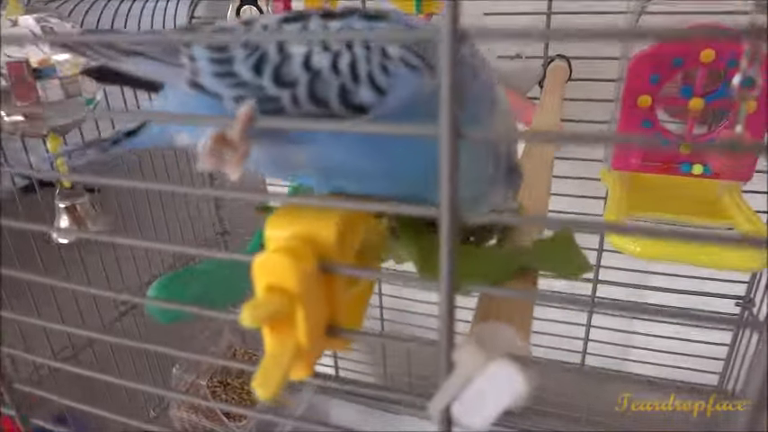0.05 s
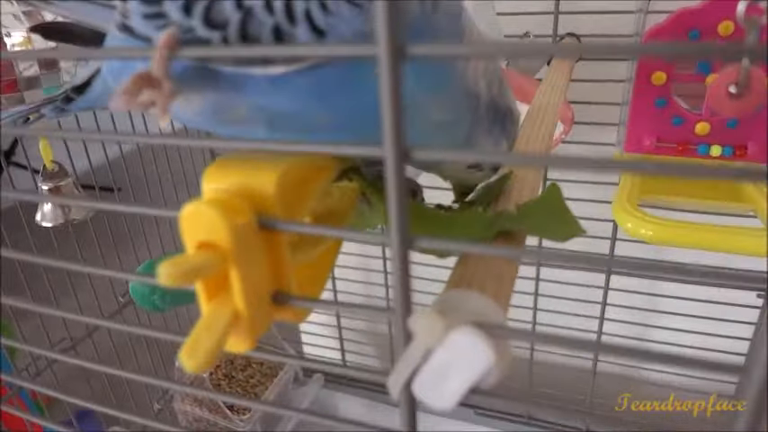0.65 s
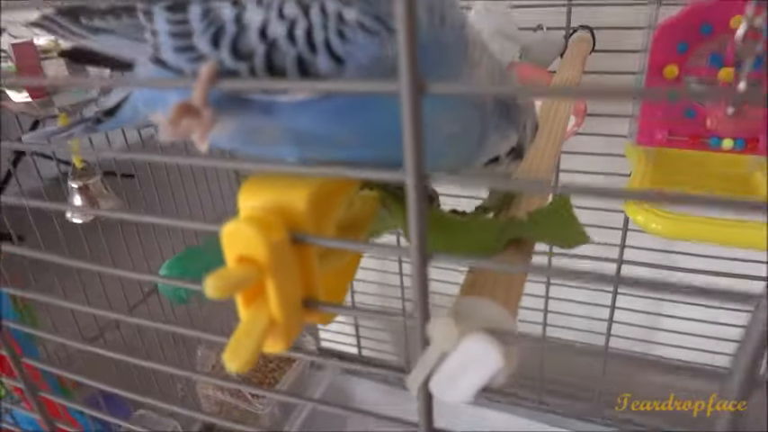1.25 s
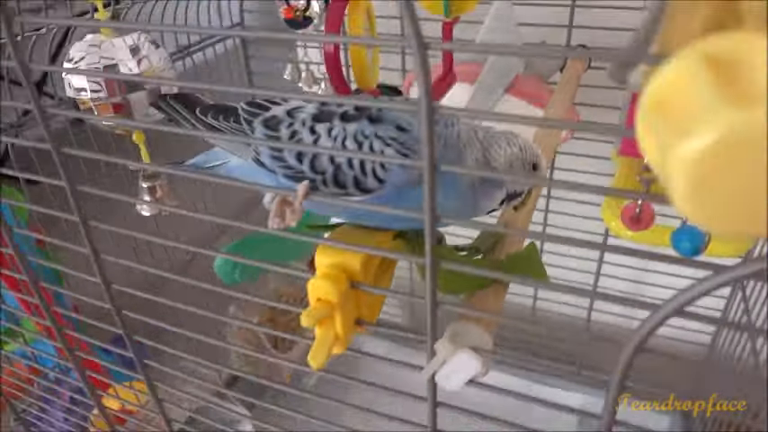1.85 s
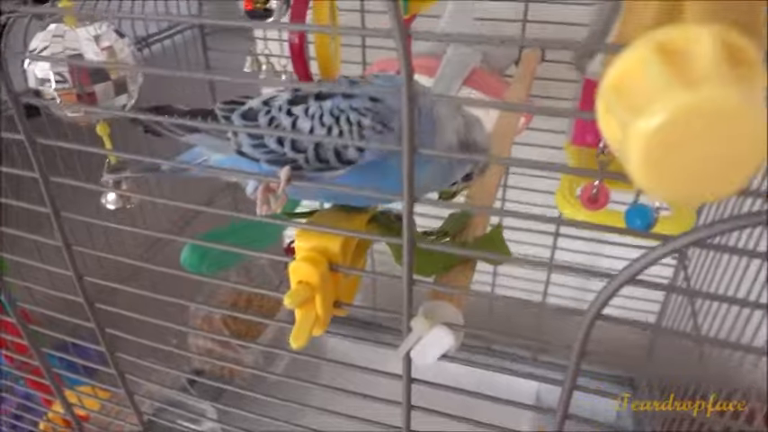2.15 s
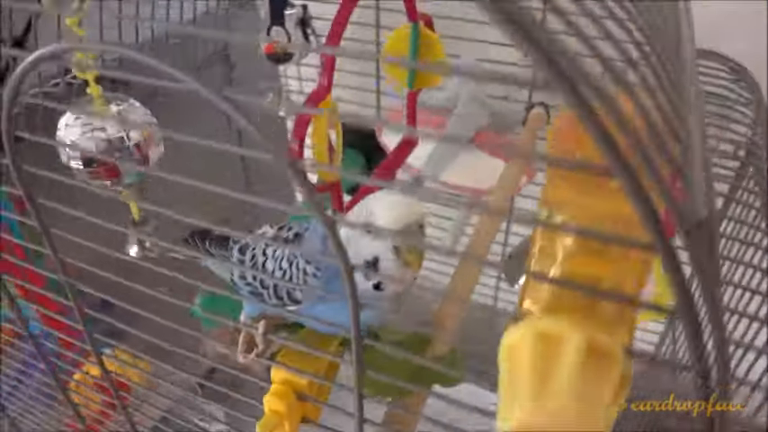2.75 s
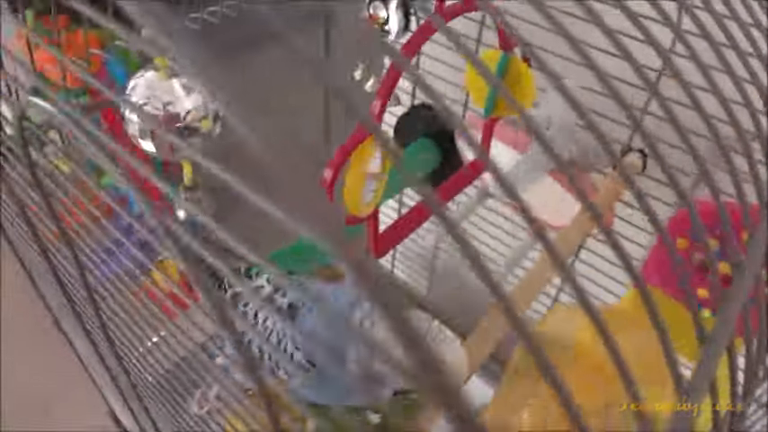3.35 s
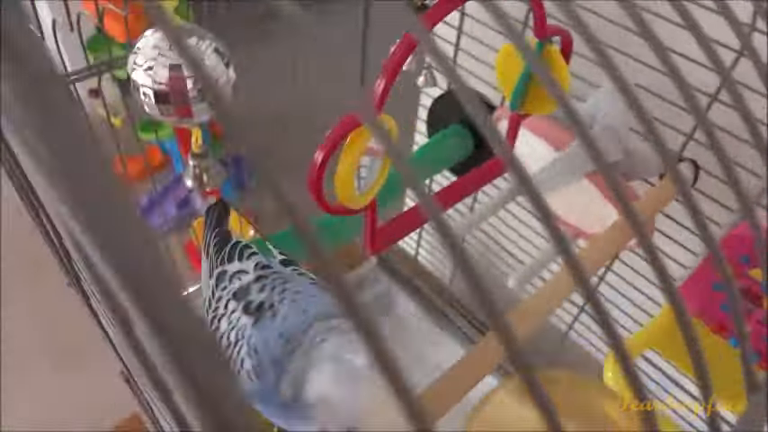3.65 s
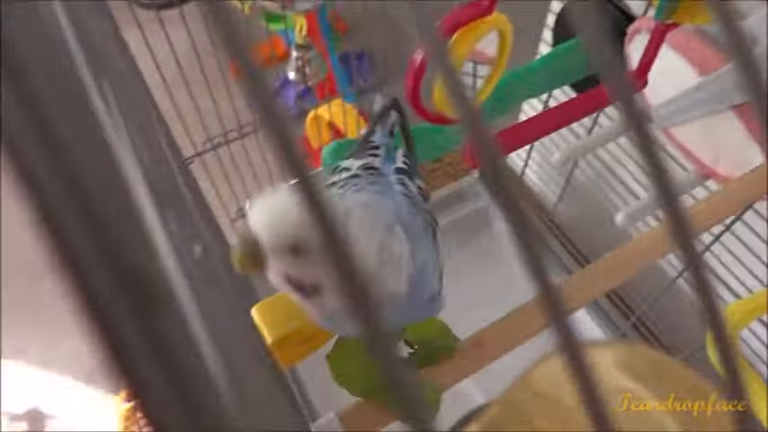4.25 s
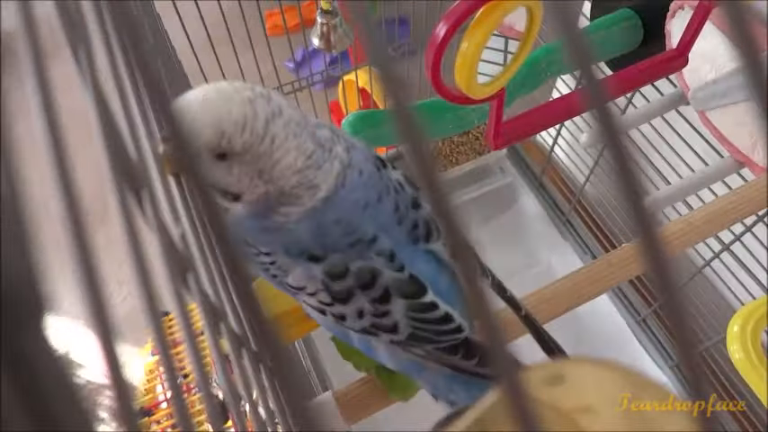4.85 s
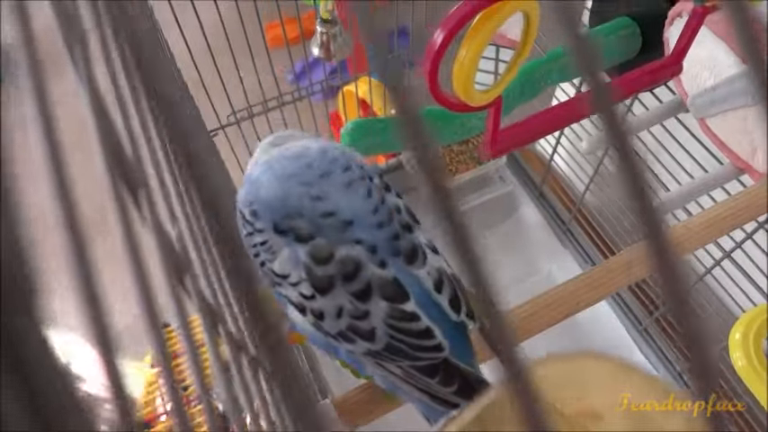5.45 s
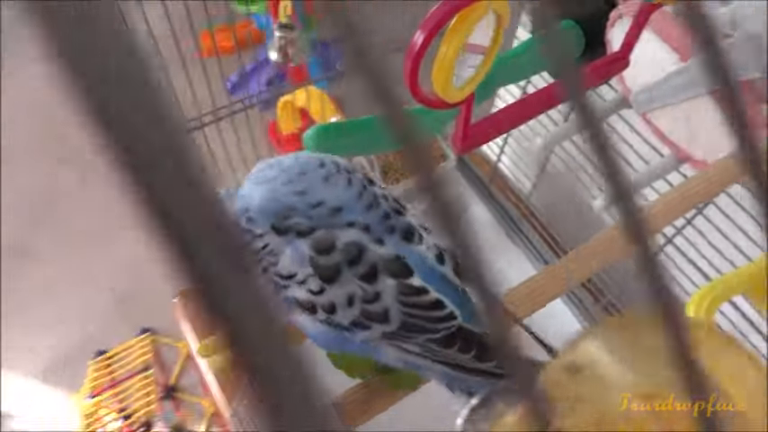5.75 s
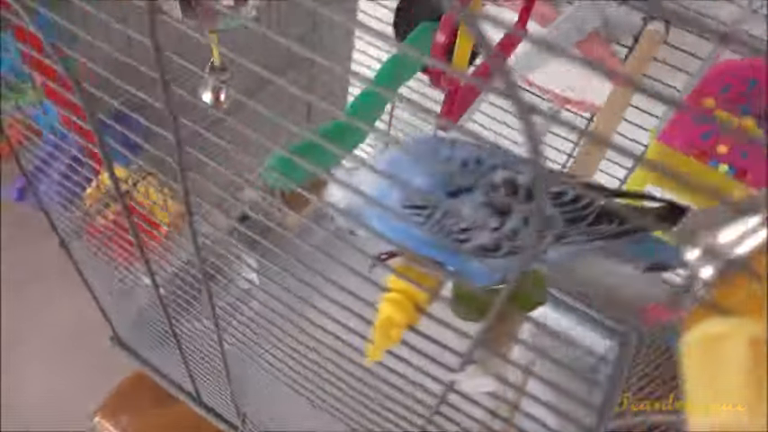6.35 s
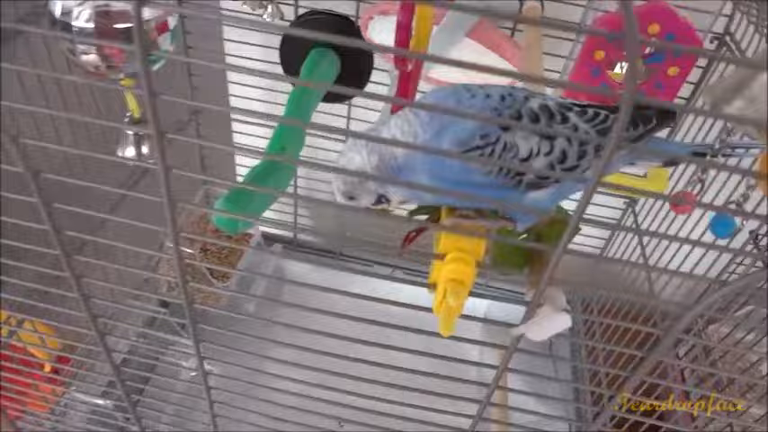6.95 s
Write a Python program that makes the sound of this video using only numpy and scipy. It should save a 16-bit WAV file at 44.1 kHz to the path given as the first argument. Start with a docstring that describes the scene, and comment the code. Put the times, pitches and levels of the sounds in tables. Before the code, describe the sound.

A small caged bird crunches a leaf close by, then climbs about with sharp beak clicks, claws ticking on bars and wires pinging.

```python
"""A budgerigar tears at a leaf in a wire cage, close by in a quiet room. Fibres fracture in crunches and
cracks, friction makes the leaf swish, and three hard snaps sound very close. As the bird steps and climbs, its
impacts excite the modes of the cage: claws tick on the bars, wires ping, a metal toy tinks and the hollow base
knocks. Soft room noise and mains hum lie beneath."""
import sys
import numpy as np
from scipy import signal
from scipy.fft import rfft, irfft, next_fast_len
from scipy.io import wavfile
from scipy.ndimage import uniform_filter1d

SR = 44100
rng = np.random.default_rng(int(sys.argv[2]) if len(sys.argv) > 2 else 0)


def dump_mix(stems):
    """Bounce the given channels to the path in sys.argv[1] as a 16-bit WAV at rate SR."""
    frames = np.atleast_2d(stems).T  # one column per channel
    limited = np.clip(frames, -1, 1)  # hard clip at full scale
    pcm = np.round(limited * 32767).astype(np.int16)
    wavfile.write(sys.argv[1], SR, pcm)


N = 309141
TIME = np.arange(N) / SR

# the leaf is pulled until it gives: (time [s], crunch level [dB], rise time [s], final crack level [dB])
BITES = [(.0795, -30.5, 0.017, -11), (0.101, -38, 0.0035, -17), (.1749, -35.5, 0.0062, -4.5),
         (.316, -46.5, 0.005, -43), (.3495, -39.5, .009, -15.5), (.4215, -49.5, 0.0022, -34),
         (.6115, -36, 0.0075, -7.5), (.786, -46, .002, -42), (0.8004, -37, 0.0049, -27),
         (2.334, -50, .012, -46), (2.495, -48, 0.007, -42), (2.555, -46, 0.021, -42),
         (2.668, -44.5, .016, -40), (4.027, -51, 0.072, -31), (5.733, -54, 0.031, -33),
         (6.002, -34, 0.021, -25), (6.085, -50.5, 0.0086, -44), (6.164, -48.5, 0.018, -44),
         (6.236, -48.5, 0.011, -49)]
# spectrum of breaking fibres: (frequency [Hz], level [dB])
LEAF_SPECTRUM = [(1500, -26), (3200, -7.5), (5700, -11.5), (7300, 1), (10000, 1.5), (12500, 0.5),
                 (15500, -9.5)]
# spectrum of leaf sliding on feathers: (frequency [Hz], level [dB])
SWISH_SPECTRUM = [(1760, -64), (3000, -20.5), (3750, -50), (4570, -23.5), (5180, -25.5), (5960, -18.5),
                  (9660, -2.5), (12300, -13), (15000, -12.5), (16000, -27)]
# spectrum of the dense upper modes of the cage: (frequency [Hz], level [dB])
RATTLE_SPECTRUM = [(290, -42), (500, -23), (708, -9.5), (1060, -15.5), (1230, -7), (1420, -27), (2160, -36),
                   (2810, -9.5), (3440, -16), (5630, 3.5), (7310, 1.5), (9220, 5.5), (12700, -11),
                   (14700, 9), (16000, -18)]
# a loose wire is jogged: (time [s], level [dB], pitch of the touched span [Hz])
WIRE_HITS = [(3.468, -58, 6400), (3.619, -55.5, 4600), (3.984, -55.5, 3800), (4.03, -53, 6270),
             (4.376, -50, 3860), (4.404, -45.5, 3620), (4.457, -47.5, 3750), (4.995, -54, 1360),
             (5.077, -57, 2100)]


def from_db(db):
    """Decibels to amplitude ratio."""
    return 10 ** (np.asarray(db) / 20)


def unit_rms(x):
    """Normalisation to unit power."""
    return x / np.sqrt(np.mean(x ** 2) + 1e-20)


def at_hz(points, hz):
    """Interpolation on a log-frequency axis."""
    frequencies, values = np.transpose(points)
    return np.interp(np.log(hz + 1e-3), np.log(frequencies), values)


def add(out, start, sound):
    """Superposition: mix a sound in at a start time in seconds."""
    at = round(start * SR)
    sound = sound[..., max(-at, 0):max(N - at, 0)]
    out[..., max(at, 0):max(at, 0) + sound.shape[-1]] += sound


def low_pass(x, cut_hz):
    """First-order roll-off of the treble."""
    return signal.sosfilt(signal.butter(1, cut_hz, fs=SR, output="sos"), x)


def high_pass(x, cut_hz):
    """Second-order high-pass: the bass below the cut-off falls away."""
    return signal.sosfilt(signal.butter(2, cut_hz, "high", fs=SR, output="sos"), x)


def noise(spectrum, coherence, grains=1):
    """Spectrally shaped stereo noise of unit power; left-right coherence is a number or a table."""
    size = next_fast_len(N)
    hz = np.fft.rfftfreq(size, 1 / SR)
    coherence = np.clip(coherence if np.isscalar(coherence) else at_hz(coherence, hz), 0, 1)
    mid, side = rfft(rng.standard_normal((2, N)) * grains, size) * from_db(at_hz(spectrum, hz))
    stereo = np.sqrt(1 + coherence) * mid + np.sqrt(1 - coherence) * side * [[1], [-1]]
    return unit_rms(irfft(stereo, size)[:, :N])


def grain(depth_db, grain_s):
    """Random amplitude modulation by many small slips and breaks."""
    flutter = unit_rms(uniform_filter1d(rng.standard_normal(N), max(int(grain_s * SR), 1)))
    return unit_rms(from_db(depth_db * np.clip(flutter, -2, 2)))


def buzz(depth, rate_hz):
    """Amplitude modulation by wires chattering in their joints."""
    shiver = unit_rms(low_pass(rng.standard_normal(N), rate_hz))
    return (1 + depth * shiver) / np.hypot(1, depth)


def resonate(x, hz, width_hz):
    """A two-pole resonator with unit peak gain."""
    radius = np.exp(-np.pi * width_hz / SR)
    feedback = [1, -2 * radius * np.cos(2 * np.pi * hz / SR), radius ** 2]
    return signal.lfilter(np.array([1, 0, -1]) * (1 - radius ** 2) / 2, feedback, x)


def mode(hz, t60):
    """Impulse response of a damped oscillator."""
    t = TIME[:int(2 * t60 * SR) + 2]
    wave = np.cos(2 * np.pi * hz * t) * from_db(-60 * t / t60)
    wave[0] /= 2
    return wave


def swell(rise, t60):
    """Exponential growth and decay: the envelope and the time to its peak."""
    lead = 6 * rise
    t = TIME[:int((lead + t60) * SR) + 2] - lead
    return np.exp(np.minimum(t, 0) / rise) * from_db(-60 * np.maximum(t, 0) / t60), lead


def envelopes(rows):
    """Incoherent sum of swells, as a gain; rows are (time [s], level [dB], rise time [s], t60 [s])."""
    power = np.zeros(N)
    for time, db, rise, t60 in rows:
        shape, lead = swell(rise, t60)
        add(power, time - lead, (from_db(db) * shape) ** 2)
    return np.sqrt(power)


def struck(hits, modes, chatter, chatter_t60, spread_db=2):
    """Modal synthesis: each blow and its brief contact chatter excite every mode with random strength."""
    out = np.zeros(N)
    fade, _ = swell(1 / SR, chatter_t60)
    for time, db, *_ in hits:
        ring = np.zeros(SR)
        for hz, mode_db, t60 in modes:
            strength, polarity = rng.standard_normal(2)
            add(ring, 0, np.sign(polarity) * from_db(db + mode_db + spread_db * strength) * mode(hz, t60))
        force = chatter * rng.standard_normal(SR)[:len(fade)] * fade / np.linalg.norm(fade)
        force[0] = 1  # the blow itself
        add(out, time, signal.fftconvolve(ring, force))
    return out


def background(room_db=-58.04, hum_hz=120.5, hum_db=-78, shuffle_gain_db=4):
    """The noise floor: broadband room noise, a tone of mains hum and soft shuffling in the cage."""
    # room noise: (frequency [Hz], level [dB])
    room_spectrum = [(15, -56), (25, -14), (92, -7.5), (114, -3.5), (263, -7), (317, -7.5), (714, 0),
                     (1290, -3), (1400, -2.5), (1520, -5), (1940, -4), (4870, -13), (5430, -13),
                     (6560, -10.5), (16000, -14.5)]
    # its likeness at the two ears: (frequency [Hz], coherence [0-1])
    room_coherence = [(60, 0.88), (150, 1), (400, 0.033), (2400, .01), (6000, 0.73), (15000, 1)]
    # course of the shuffling: (time [s], level [dB])
    shuffle_levels = [(0.0, -71), (0.43, -70), (2.88, -66), (3.2, -76), (4.42, -64.5), (4.62, -61.5),
                      (5.83, -64.5), (6.3, -68), (7.0, -66.5)]
    # its spectrum: (frequency [Hz], level [dB])
    shuffle_spectrum = [(100, -23.5), (300, 0.5), (800, -6), (2000, -12.5), (6000, -15), (15000, -59)]
    air = from_db(room_db) * noise(room_spectrum, room_coherence)
    hum = np.sqrt(2) * from_db(hum_db) * np.sin(2 * np.pi * hum_hz * TIME)
    shuffle = noise(shuffle_spectrum, coherence=0.53, grains=grain(depth_db=2.5, grain_s=0.04))
    shuffle *= from_db(shuffle_gain_db + np.interp(TIME, *np.transpose(shuffle_levels)))
    return air + hum + shuffle


def reverberation(x, t60=0.36):
    """The diffuse field of a furnished room decays exponentially, differently at each ear."""
    t = TIME[:SR // 2]
    tail = rng.standard_normal((2, len(t))) * from_db(-60 * t / t60) * (t > 0.004)
    tail = low_pass(tail, cut_hz=6000)
    return signal.fftconvolve(x, tail / np.sqrt(np.sum(tail ** 2) / 2), axes=1)[:, :N]


def loose_wire(jangle_db=-2, jangle_t60=0.26):
    """Contact chatter: a jogged wire rings in inharmonic modes and jangles."""
    # modes of the wire: (frequency [Hz], level [dB], t60 [s])
    wire_modes = [(1110, -11, .45), (1300, -13.5, 0.46), (1590, -8.5, 0.27), (2640, -13, 0.47),
                  (3830, 0.5, 0.061), (4480, -20, 0.39), (4800, -8.5, 0.3), (4880, -16, 0.17),
                  (6950, -5, 0.25), (7460, -12, .22), (8100, -7.5, 0.19), (9300, -8, 0.25),
                  (9944, -4, 0.34)]
    # spectrum of its jangle: (frequency [Hz], level [dB])
    jangle_spectrum = [(300, -23), (1200, -18), (2000, -30), (4500, 10), (5500, 0), (7000, -2), (10000, -3),
                       (11500, -16), (16000, -20)]
    ring = struck(WIRE_HITS, wire_modes, chatter=0.94, chatter_t60=0.14) * buzz(depth=1, rate_hz=75)
    jangle = noise(jangle_spectrum, coherence=0.98, grains=grain(depth_db=2, grain_s=0.0007))
    jangle *= envelopes([(time, db + jangle_db, 0.0005, jangle_t60) for time, db, _ in WIRE_HITS])
    return ring + jangle


def cage_frame():
    """Impact excitation: the bumped frame rings in quickly damped modes."""
    # bumps on the frame: (time [s], level [dB])
    hits = [(3.7275, -37), (3.818, -50.5)]
    # modes of the frame: (frequency [Hz], level [dB], t60 [s])
    frame_modes = [(1220, -6, .06), (1338, 4.5, 0.041), (1436, -11, 0.051), (2256, -6, 0.074),
                   (2480, -9, .06), (2990, -17, 0.042), (3230, 0.5, 0.031), (4350, -1, 0.034),
                   (4620, -6, 0.03), (5500, -15, 0.05), (8350, -12.5, 0.036)]
    return struck(hits, frame_modes, chatter=0.4, chatter_t60=0.033)


def metal_toy(ring_db=-1, clink_db=-6, clink_t60=0.035):
    """A small body has high natural frequencies: the toy tinks, with a short noisy clink."""
    # blows on the toy: (time [s], level [dB])
    hits = [(2.4163, -34.5), (2.4411, -26.5)]
    # modes of the toy: (frequency [Hz], level [dB], t60 [s])
    toy_modes = [(7280, 3, 0.11), (7500, -3, 0.052), (14990, -4, 0.087), (15210, -9, .04)]
    ring = from_db(ring_db) * struck(hits, toy_modes, chatter=0.2, chatter_t60=0.028, spread_db=0.5)
    clink = noise(RATTLE_SPECTRUM, coherence=0.88)
    clink *= envelopes([(time, db + clink_db, 0.0002, clink_t60) for time, db in hits])
    return ring + clink


def wire_pings(buzz_hz=80, loose_db=-52, rise_cycles=18, free_t60=0.39, joint_loss_hz=5000):
    """Nonlinear damping: faint wires ring long; wide, fast swings buzz and lose energy in the joints."""
    # single wires left ringing: (time [s], frequency [Hz], level [dB])
    pings = [(.98, 4770, -67.5), (1.19, 6620, -60), (1.21, 3246, -69), (2.55, 1800, -52),
             (2.648, 4800, -48), (3.7, 1350, -53.5), (3.82, 1350, -56.5), (4.06, 1105, -43.5),
             (4.42, 1110, -59), (4.945, 2030, -59), (5.195, 4730, -60.5), (5.299, 4550, -55),
             (6.334, 1960, -61), (6.61, 2740, -64)]
    out = np.zeros(N)
    chatter = unit_rms(low_pass(rng.standard_normal((2, N)), buzz_hz))
    for time, hz, db in pings + [(time, hz, db) for time, db, hz in WIRE_HITS]:
        swing = from_db(db - loose_db)
        t60 = free_t60 / (1 + swing ** 2 * hz / joint_loss_hz)
        shape, lead = swell(rise_cycles / hz, t60)
        phase = 2 * np.pi * hz * TIME[:len(shape)]
        in_phase, quadrature = np.tanh(swing) * np.roll(chatter, -int(time * SR), axis=1)[:, :len(shape)]
        wave = (1 + in_phase) * np.sin(phase) + quadrature * np.cos(phase)
        add(out, time - lead, np.sqrt(2) * from_db(db) * shape * wave)
    return high_pass(out, cut_hz=780)


def bumps(relative_width=0.37, t60_cycles=74, stereo_spread=0.079):
    """Heavy damping makes a resonance broad: perch and base, shaken for a moment, give a dull bump."""
    # bumps of perch and cage base: (time [s], frequency [Hz], level [dB])
    hits = [(1.963, 990, -45.5), (2.517, 454, -42.5), (2.799, 263, -56), (4.06, 318, -51),
            (6.745, 155, -49), (6.894, 287, -54)]
    out = np.zeros((2, N))
    for time, hz, db in hits:
        shape, lead = swell(rise=0.0014, t60=t60_cycles / hz)
        shake = rng.standard_normal(len(shape)) + stereo_spread * rng.standard_normal((2, len(shape)))
        body = resonate(resonate(shake, hz, relative_width * hz), hz, 2 * relative_width * hz)
        add(out, time - lead, from_db(db) * shape * unit_rms(body))
    return out


def knocks(scuff_db=-1, base_db=-3, base_side=0.67, rise_per_t60=0.04, jog_db=-15, jog_t60=0.61):
    """Forced vibration: soft contacts and the jogged wire scuff the perch and drive the hollow base."""
    # feet and body against perch and cage: (time [s], level [dB], t60 [s])
    hits = [(0.081, -44, 0.027), (.745, -59.5, 0.31), (1.445, -60.5, .25), (1.72, -58.5, 0.34),
            (1.962, -45.5, 0.025), (2.33, -57.5, 0.28), (2.516, -53, 0.14), (2.645, -52, .08),
            (2.714, -48, 0.22), (2.78, -43, 0.33), (3.2058, -40.5, 0.017), (3.728, -41.5, 0.066),
            (4.03, -50, 0.52), (4.708, -44, 0.35), (4.805, -39.5, 0.063), (4.938, -53.5, 0.61),
            (5.078, -44.5, 0.15), (5.368, -52.5, 0.092), (5.723, -49, 0.34), (6.06, -50.5, 0.16),
            (6.107, -49.5, 0.074), (6.332, -49, 0.13), (6.593, -52.5, .28), (6.725, -50, 0.18),
            (6.872, -52.5, 0.28)]
    # spectrum of the scuffing: (frequency [Hz], level [dB])
    scuff_spectrum = [(150, -28), (330, -13.5), (900, 0.5), (1900, -2), (3100, 2.5), (3600, -4),
                      (4800, -6.5), (9000, -8.5), (15000, -27)]
    # resonances of the base: (frequency [Hz], bandwidth [Hz], level [dB])
    base_modes = [(337, 14, 2.5), (483, 24, -2.5), (862, 34, 4), (1130, 39, -6), (1409, 33, 4.5),
                  (1774, 92, -3), (1987, 19, 0.5), (2656, 60, 6), (3080, 51, 2), (4390, 78, -2.5),
                  (6400, 46, -3)]
    contacts = [(time, db, rise_per_t60 * t60, t60) for time, db, t60 in hits]
    jogs = [(time, db + jog_db, 0.003, jog_t60) for time, db, _ in WIRE_HITS]
    force = envelopes(contacts + jogs)
    slips = grain(depth_db=3.5, grain_s=0.0016)
    scuff = noise(scuff_spectrum, coherence=1, grains=slips) * force
    mid, side = rng.standard_normal((2, N)) * slips * force
    drive = mid + base_side * side * [[1], [-1]]
    base = sum(from_db(db) * resonate(drive, hz, width) for hz, width, db in base_modes)
    return from_db(scuff_db) * scuff + from_db(base_db) * unit_rms(base) * np.std(force)


def claw_taps(modes_db=-8, bar_hz=10350, bar_width_hz=750, tap_t60=0.13, tick_db=3, tick_t60=0.0027):
    """Coupled vibration: a claw ticks, the touched bar sings, and the whole cage rattles and rings."""
    # claws and beak on the bars: (time [s], level [dB], relative level of the touched bar [dB])
    taps = [(3.614, -48.5, 7), (4.456, -52, -16), (4.486, -48.5, 4.5), (4.534, -45.5, 0),
            (4.6557, -37.5, 10), (4.7058, -17, -13), (4.767, -37, 1), (4.793, -37.5, 2), (4.855, -47, -1.5),
            (4.931, -47.5, -11), (5.0565, -47, -6), (5.076, -42.5, -12), (5.263, -48.5, -17),
            (5.298, -48.5, 12.5), (5.449, -53, -15), (5.545, -55.5, 4), (5.571, -51, 4)]
    # modes of the bars: (frequency [Hz], level [dB], t60 [s])
    bar_modes = [(1070, -10, 0.08), (1355, -10.5, 0.071), (2830, -17.5, 0.14), (4650, -13.5, 0.23),
                 (5600, -2, 0.14), (5700, -5, 0.136), (6060, -9, 0.18), (6180, -10, 0.16), (7580, -8, 0.16),
                 (7900, -9, 0.087), (8900, -7, 0.05), (9000, -4.5, 0.14), (8800, -14, 0.13),
                 (9500, -13, 0.13), (9400, -5, 0.18), (9300, -19, 0.102), (11100, -12, 0.074),
                 (11500, 1, 0.07), (14400, -13, .15), (15300, 0, .07), (15740, -1, .09)]
    ringing = from_db(modes_db) * struck(taps, bar_modes, chatter=0.35, chatter_t60=0.016, spread_db=-0.5)
    ringing *= buzz(depth=0.47, rate_hz=57)
    rattle = envelopes([(time, db, 0.0002, tap_t60) for time, db, _ in taps])
    tick = envelopes([(time, db + tick_db, 0.0002, tick_t60) for time, db, _ in taps])
    cage = noise(RATTLE_SPECTRUM, coherence=0.918, grains=grain(depth_db=3.5, grain_s=0.00055))
    cage *= np.hypot(rattle, tick)
    bar = resonate(rng.standard_normal(N), bar_hz, bar_width_hz)
    bar = unit_rms(resonate(bar, bar_hz, 2 * bar_width_hz))
    bar *= envelopes([(time, db + bar_db, 0.0003, tap_t60) for time, db, bar_db in taps])
    return high_pass(ringing + cage + bar, cut_hz=500)


def swishes(attack_db_per_s=605, growth_db_per_s=55, release_db_per_s=750):
    """Sliding friction: each stroke sets in quickly, grows while the leaf slides, and lets go."""
    # leaf and feathers brush past each other: (time [s], duration [s], starting level [dB])
    strokes = [(2.754, 0.0087, -38.5), (2.829, 0.01, -43), (2.903, 0.11, -41.5)]
    gain = 0
    for time, duration, db in strokes:
        t = TIME - time
        attack = attack_db_per_s * np.minimum(t, 0)
        growth = growth_db_per_s * np.clip(t, 0, duration)
        release = release_db_per_s * np.maximum(t - duration, 0)
        gain += from_db(np.maximum(db + attack + growth - release, -140))
    return noise(SWISH_SPECTRUM, coherence=0.98, grains=grain(depth_db=1, grain_s=0.0016)) * gain


def hard_snaps(ring_db=1, pivot_hz=7800, tail_db=-37, tail_t60=0.048):
    """Hard snaps: a few modes ring and die within milliseconds, trailed by faint noise."""
    # hard snaps: (time [s], level [dB], spectral tilt [dB/octave])
    snaps = [(3.068, -0.5, 0.5), (3.2442, -5, -2), (5.8917, -2, -1.4)]
    # modes of the snaps: (frequency [Hz], level [dB], t60 [s])
    snap_modes = [(1460, -33, 0.021), (1880, -37.5, 0.017), (4460, -17, 0.0016), (7900, -0.5, 0.0029),
                  (8740, -13.5, 0.0052), (10150, -11.5, 0.0037), (14700, -25, 0.0018)]
    ring = np.zeros(N)
    for time, db, tilt in snaps:
        for hz, mode_db, t60 in snap_modes:
            add(ring, time, from_db(db + mode_db + ring_db + tilt * np.log2(hz / pivot_hz)) * mode(hz, t60))
    tail = noise(SWISH_SPECTRUM, coherence=0.36)
    tail *= envelopes([(time, db + tail_db, 0.0002, tail_t60) for time, db, _ in snaps])
    return high_pass(ring, cut_hz=700) + tail


def beak_clicks(click_hz=9300, spread_octaves=0.16, click_t60=0.0022, hollow_hz=3330, hollow_db=-20,
                second_delay_s=0.009, second_db=-16, second_hz=7900,
                fibre_count=4, fibre_db=9, fibre_spread_db=4, tail_db=-28, tail_t60=0.072):
    """Transients: each click or crack is a brief ring with a noisy tail; a bite scatters several."""
    # lone clicks of beak and claws: (time [s], level [dB])
    lone_clicks = [(.873, -38.5), (1.121, -33), (2.649, -35), (2.782, -27), (3.179, -28), (3.599, -23),
                   (3.96, -26.5), (4.457, -25), (4.589, -30.5), (4.618, -30), (4.6572, -30), (4.7075, -8),
                   (4.7095, -8), (4.714, -15), (4.806, -24), (4.8551, -16), (5.298, -17), (5.5454, -36),
                   (5.801, -28), (5.9925, -32), (6.107, -24)]
    clicks = [(time, db, click_hz) for time, db in lone_clicks]
    for time, crunch_db, rise, crack_db in BITES:
        clicks.append((time, crack_db, click_hz))
        clicks.append((time + second_delay_s, crack_db + second_db, second_hz))  # one more fibre parts
        for offset, size in rng.standard_normal((fibre_count, 2)):
            clicks.append((time + rise * offset / 2, crunch_db + fibre_db + fibre_spread_db * size, click_hz))
    ring = np.zeros(N)
    hollow = from_db(hollow_db) * mode(hollow_hz, click_t60)
    for time, db, hz in clicks:
        detune = 2 ** rng.normal(0, spread_octaves)
        add(ring, time, from_db(db) * (mode(hz * detune, click_t60) + hollow))
    tail = noise(LEAF_SPECTRUM, coherence=0.66)
    tail *= envelopes([(time, db + tail_db, 0.0002, tail_t60) for time, db, _ in clicks])
    return high_pass(ring, cut_hz=4600) + tail


def leaf_crunch(gain_db=3, fall_s=0.0061, fall_per_rise=0.58, glide_s_per_octave=0.01):
    """Fracture noise: fibres break in a swelling cloud, fine ones first, so the treble falls in pitch."""
    fibres = noise(LEAF_SPECTRUM, coherence=0.95, grains=grain(depth_db=5.5, grain_s=0.0012))
    # a slower pull also lets go more slowly; ln(1000) turns a time constant into a t60
    tearing = envelopes([(time, db + gain_db, rise, (fall_s + fall_per_rise * rise) * np.log(1000))
                         for time, db, rise, _ in BITES])
    out = 0
    for hz in np.geomspace(2000, 14000, 9):
        band = signal.butter(2, [hz / 1.13, hz * 1.13], "band", fs=SR, output="sos")
        delay = glide_s_per_octave * np.log2(10000 / hz) if hz > 6000 else 0
        out += signal.sosfilt(band, fibres) * np.interp(TIME - delay, TIME, tearing)
    return out


def scene(cage_wet_db=-19, metal_wet_db=-11, pan_db=0.5):
    """Direct-to-reverberant ratio sets distance: the snaps are nearest, the metal fittings farthest."""
    cage = leaf_crunch() + beak_clicks() + swishes() + claw_taps() + knocks() + bumps()
    metal = loose_wire() + cage_frame() + metal_toy() + wire_pings()
    direct = (cage + metal + hard_snaps()) * from_db([[-pan_db], [pan_db]])  # just right of centre
    reflected = reverberation(from_db(cage_wet_db) * cage + from_db(metal_wet_db) * metal)
    return direct + reflected + background()


def record(dry):
    """Band limiting and clipping: a steep cut above 16 kHz, and peaks stop at full scale."""
    treble_cut = signal.ellip(10, 0.1, 70, 16000, fs=SR, output="sos")
    return np.clip(signal.sosfilt(treble_cut, dry), -1, 1)


dry = scene()
out = record(dry)
dump_mix(out)
```